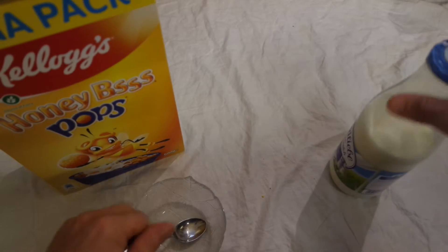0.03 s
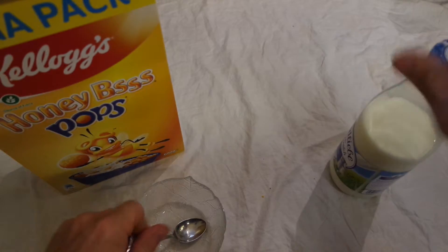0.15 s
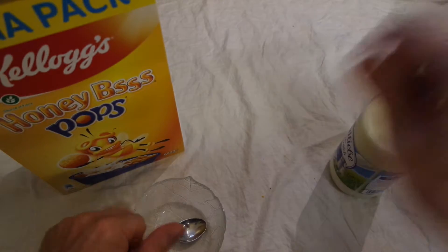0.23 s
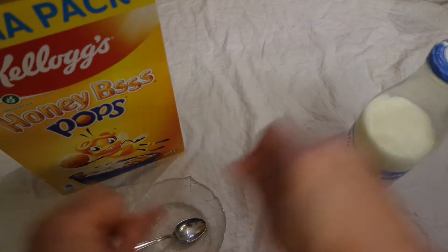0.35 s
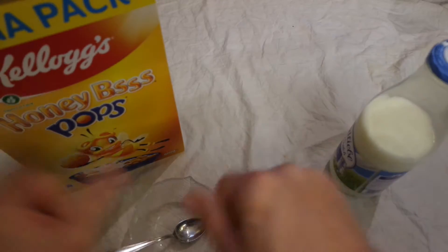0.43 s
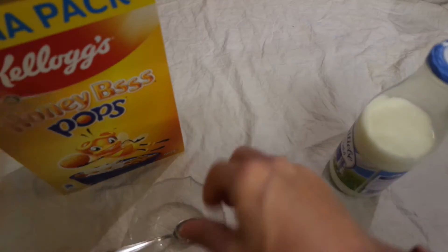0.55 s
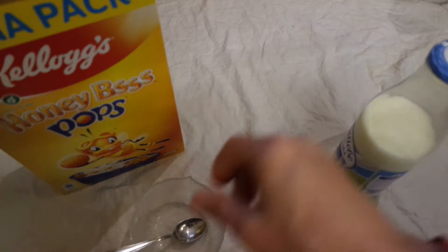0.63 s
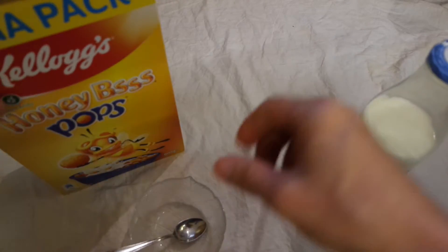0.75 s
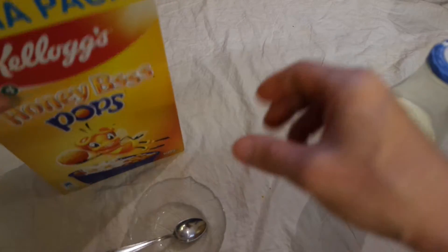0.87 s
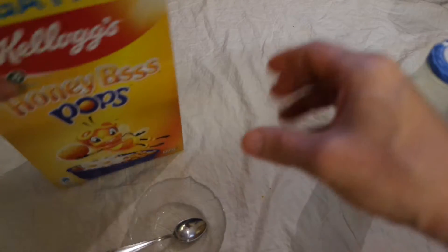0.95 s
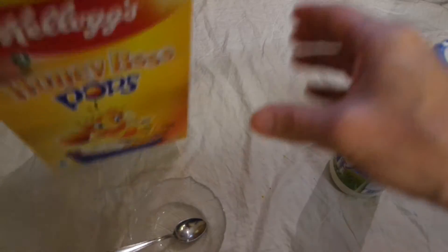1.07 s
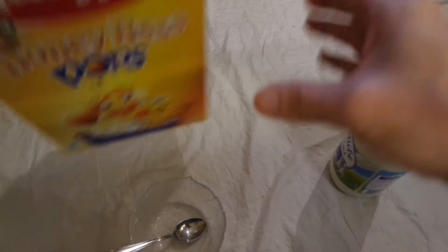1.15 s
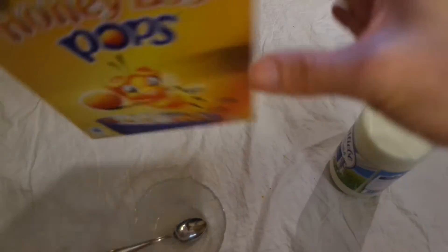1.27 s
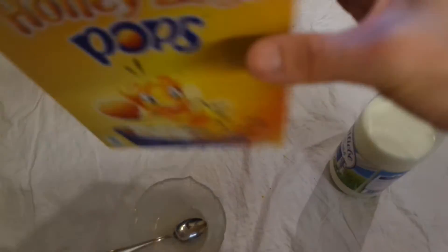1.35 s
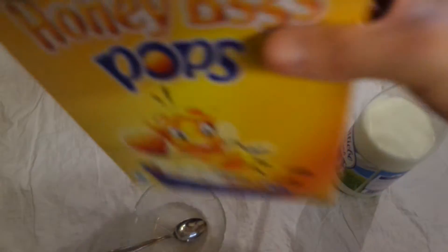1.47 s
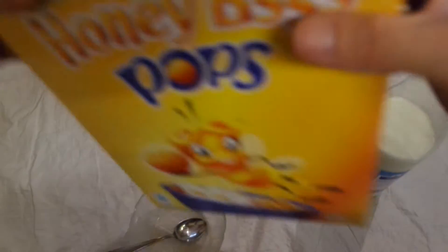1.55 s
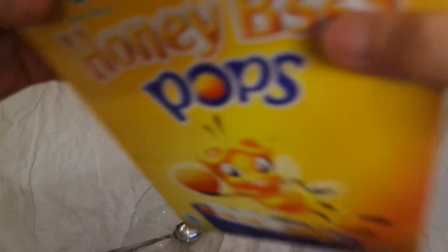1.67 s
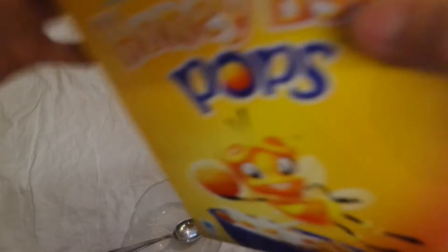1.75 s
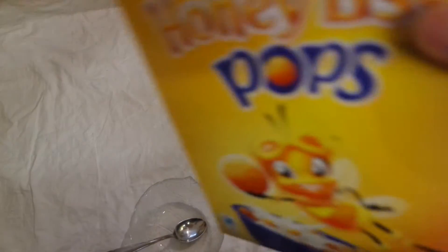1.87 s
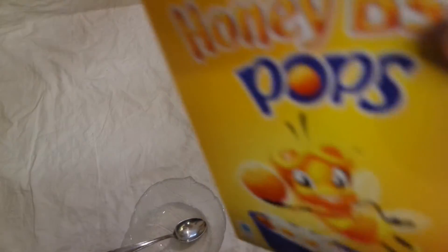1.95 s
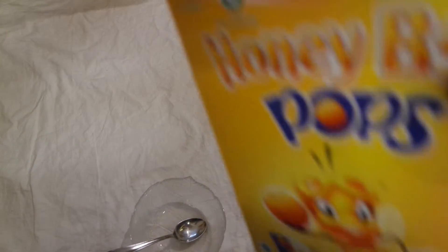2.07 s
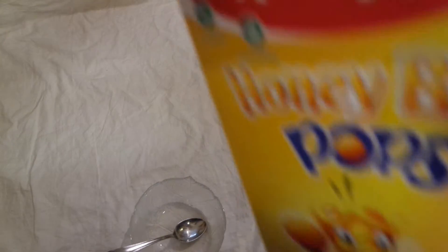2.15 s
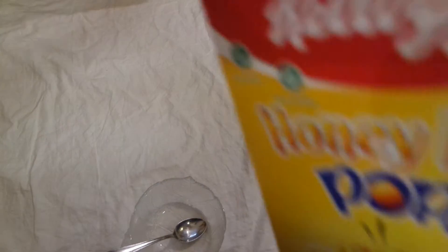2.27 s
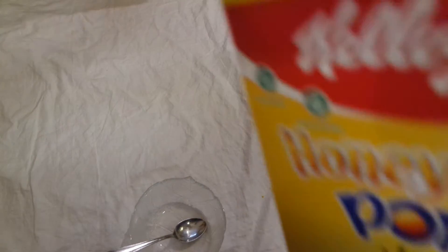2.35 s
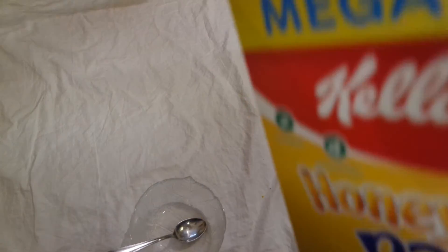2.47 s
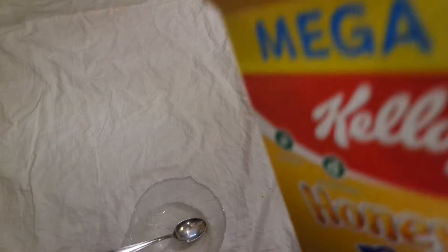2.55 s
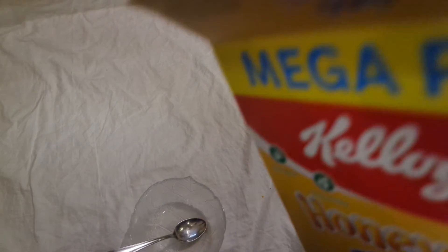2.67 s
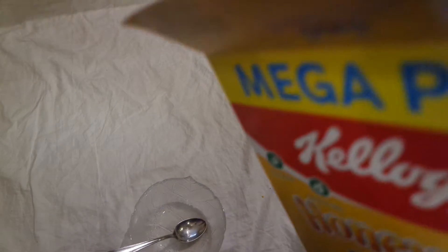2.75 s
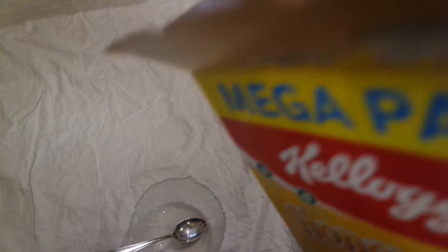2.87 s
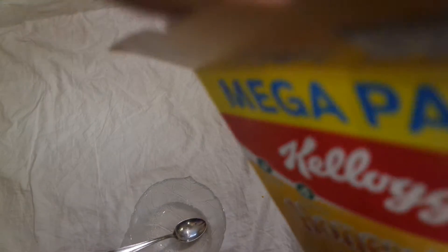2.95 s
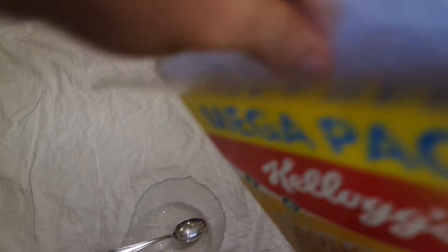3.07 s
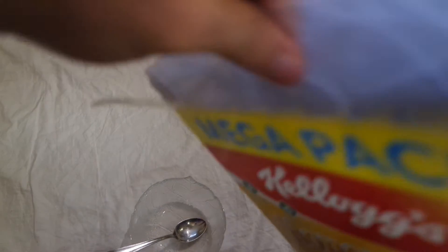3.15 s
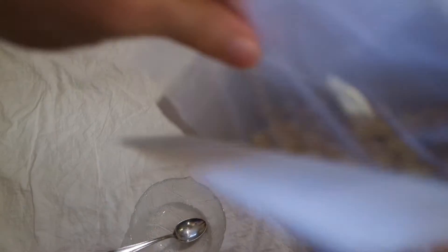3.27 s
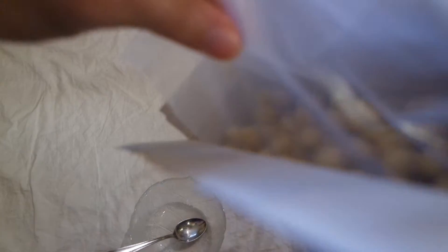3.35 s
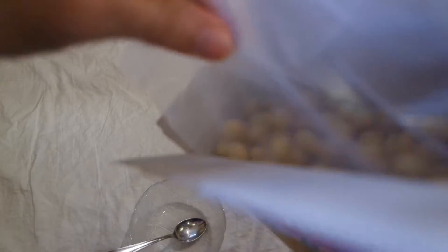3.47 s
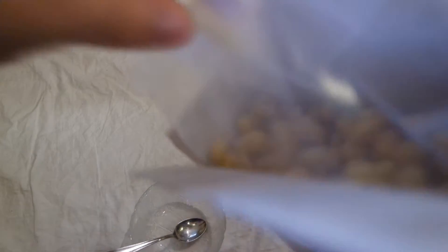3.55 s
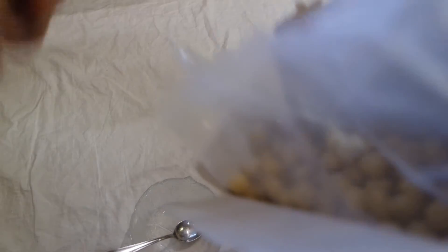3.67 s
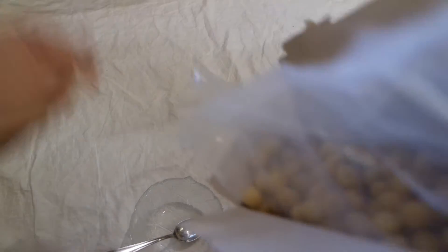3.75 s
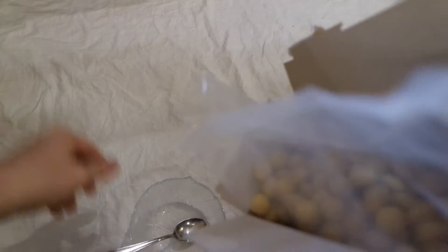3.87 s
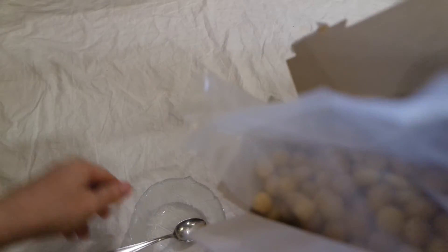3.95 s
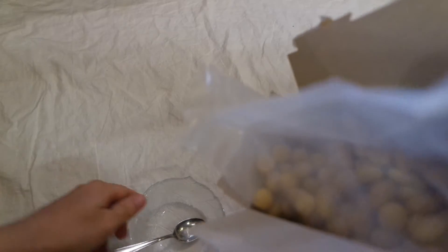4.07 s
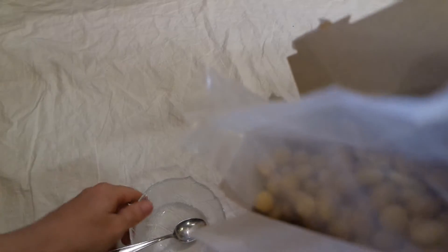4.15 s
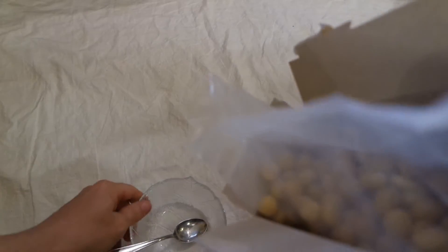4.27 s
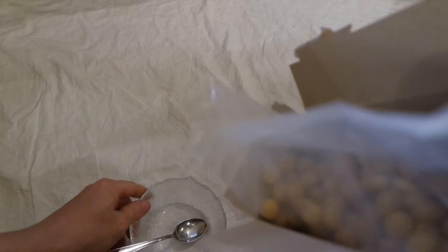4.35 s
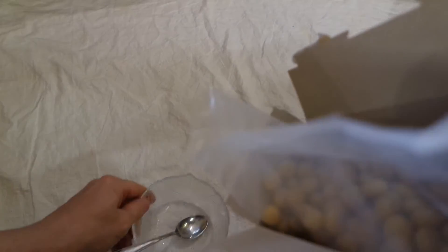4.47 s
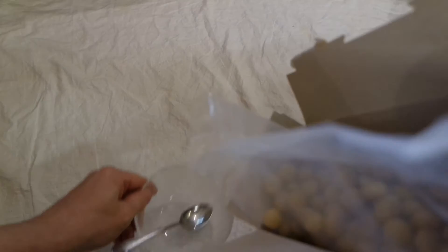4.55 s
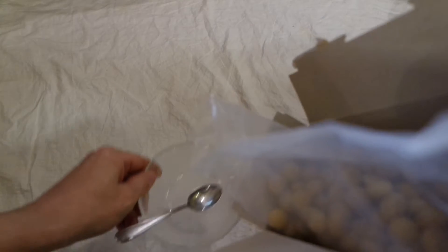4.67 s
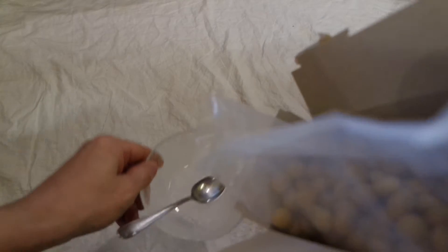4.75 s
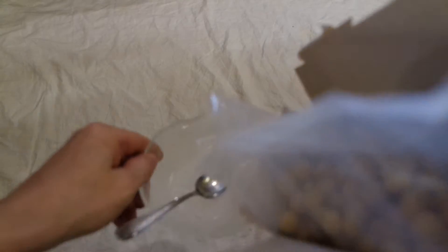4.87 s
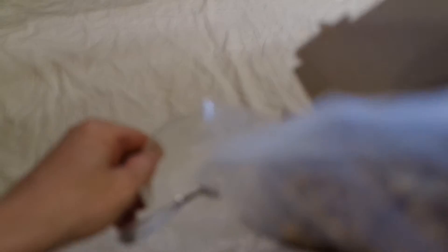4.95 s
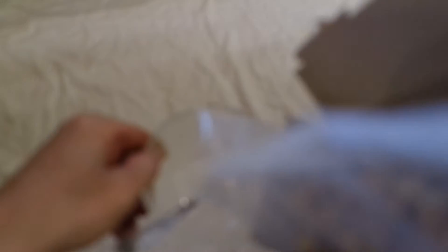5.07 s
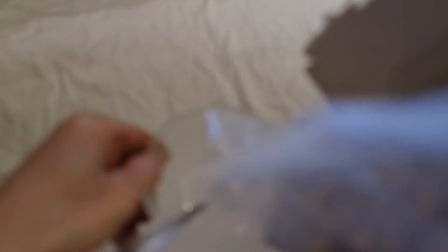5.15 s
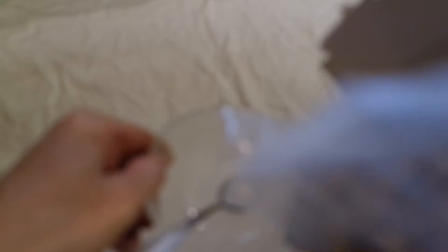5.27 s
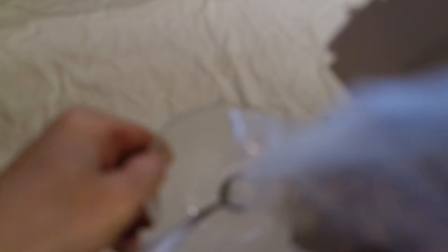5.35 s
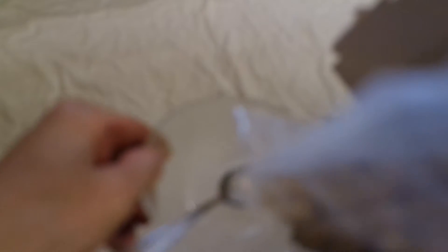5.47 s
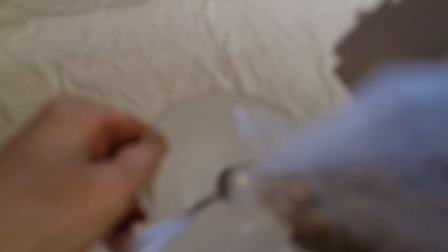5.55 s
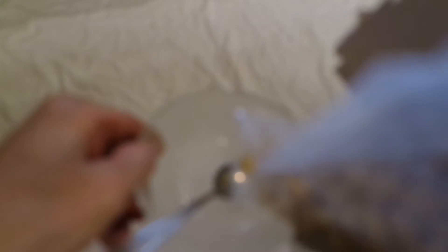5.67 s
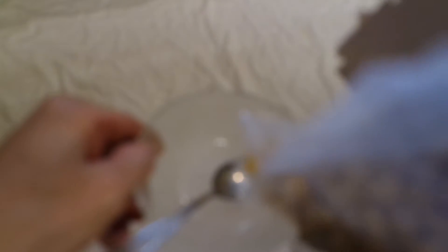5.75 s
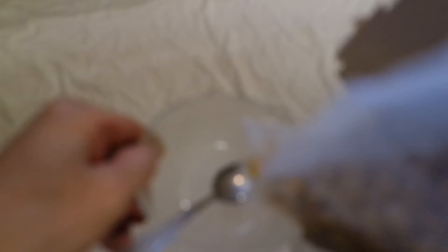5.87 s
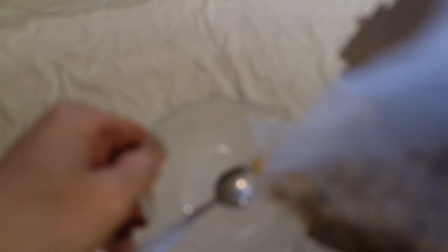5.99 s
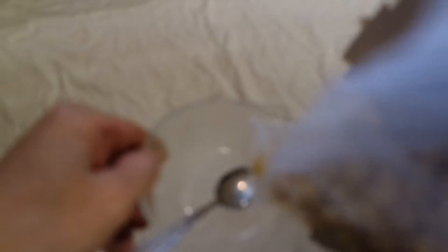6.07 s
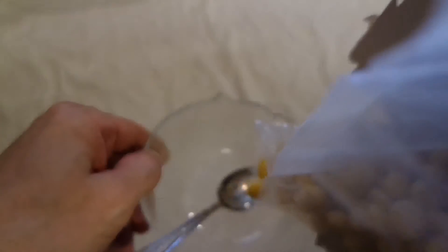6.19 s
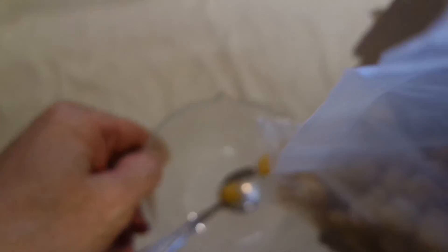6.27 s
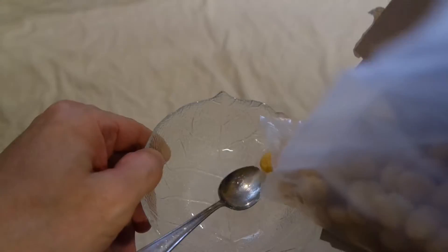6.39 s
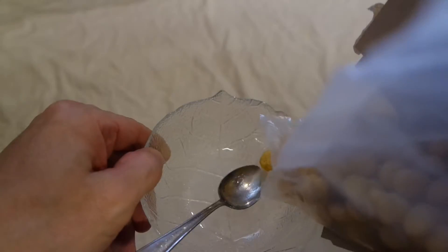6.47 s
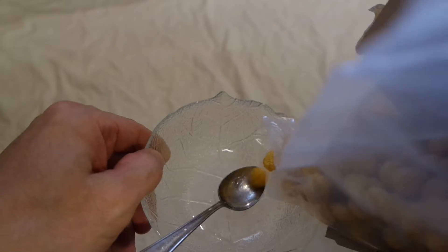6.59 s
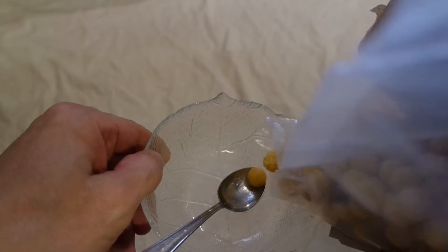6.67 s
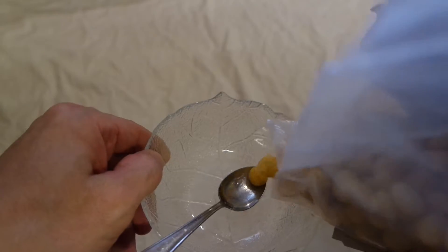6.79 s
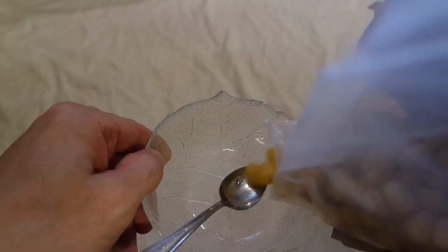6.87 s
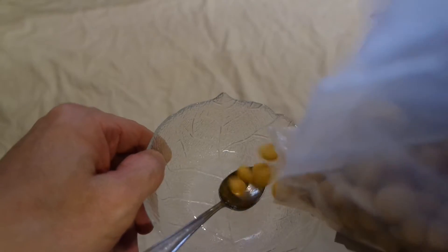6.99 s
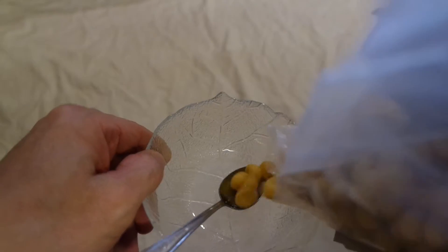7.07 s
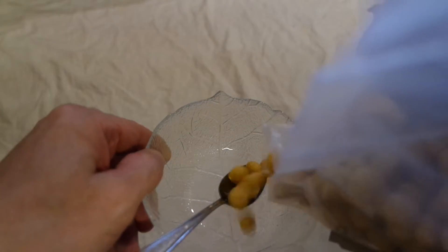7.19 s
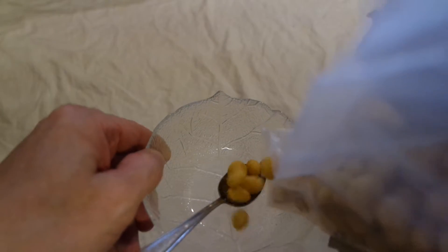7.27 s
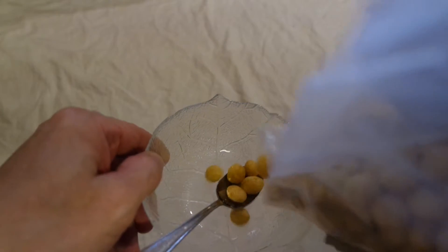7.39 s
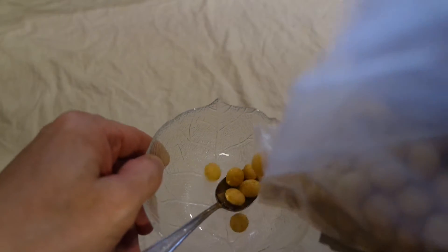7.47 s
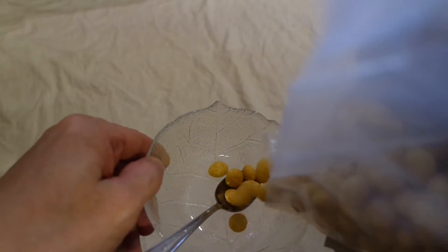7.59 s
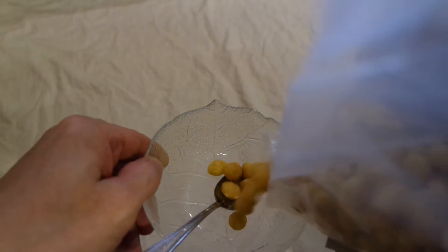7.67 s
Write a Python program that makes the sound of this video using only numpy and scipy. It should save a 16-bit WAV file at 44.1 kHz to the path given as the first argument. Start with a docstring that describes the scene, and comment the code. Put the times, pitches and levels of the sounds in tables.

```python
"""Recorded close up in a small, quiet room, through the two microphone ports of a camera.
First a hand brushes cloth on the left (high hiss), then a cardboard box of cereal balls is lifted and tipped:
a low rumble, tumbling grains, snaps of card and a faint squeak of skin (two gliding whistles).
From 3 s the plastic bag is pulled open (bright bursts); from 6 s the balls slide to its lip.
The first few drop onto a steel spoon in a glass bowl, where chattering contacts feed decaying modes."""
import sys
import numpy as np
from scipy import signal
from scipy.fft import rfft, irfft, next_fast_len
from scipy.io import wavfile
from scipy.ndimage import uniform_filter1d

SR = 44100
rng = np.random.default_rng(int(sys.argv[2]) if len(sys.argv) > 2 else 0)


def dump(signal):
    """Clip the signal to [-1, 1] and save it as 16-bit WAV at the path in sys.argv[1]."""
    limited = np.clip(np.atleast_2d(signal).T, -1, 1)
    pcm = np.round(limited * 32767).astype(np.int16)
    wavfile.write(sys.argv[1], SR, pcm)


N = 340893
TIME = np.arange(N) / SR  # s
EDGE_HZ = 15150  # upper band limit of the recorder

# Steady air of the room and microphone hiss. Each row: frequency in Hz, relative density in dB per Hz.
HUSH_COLOUR = [(12, -30.5), (20, -0.5), (54, -2), (174, -11.5), (302, -10.5), (587, -14), (865, -18),
               (940, -20), (1110, -17.5), (1270, -20), (2620, -21), (6010, -26.5), (15000, -26.5)]
HUSH_DB = -67
# Ring of the room. Each row: frequency in Hz, t60 in s.
ROOM_T60 = [(150, 0.43), (1000, 0.41), (4000, 0.26), (14000, 0.18)]
# Strokes of a hand over the cloth on the left. Each row: time of the peak in s, peak level in dB.
BRUSH_STROKES = [(.11, -76), (.2, -68.5), (.36, -63), (.48, -69), (.58, -54.5)]
BRUSH_DB_PER_S = 271  # each stroke swells and fades at this rate

# Low rumble as the box is gripped and lifted. In order: start in s, rise in s, hold in s.
LIFT_TIMES = (0.81, .03, .48)
LIFT_DB, LIFT_DB_PER_S = -53, 141.5  # level and settling
# Soft thuds of the box and of the bowl on the cloth.
# Each row: start in s, level in dB before the decay, centre in Hz, t60 in s.
THUDS = [(1.675, -35, 110, 0.14), (1.677, -39, 754, 0.29), (2.775, -57, 170, 0.17),
         (3.078, -37.5, 103.6, 0.15), (3.926, -31, 380, 0.061), (4.723, -55.5, 199, 0.34)]
# A fingertip squeaks faintly on the glossy card. Each row: time in s, pitch in Hz, level in dB.
SQUEAK_GLIDE = [(1.97, 12000, -69), (2.02, 12500, -64), (2.13, 12000, -78), (2.2, 13300, -65),
                (2.25, 13600, -63), (2.29, 12100, -72), (2.341, 10770, -91)]
SQUEAK_SECOND = 0.85  # pitch of the second whistle relative to the first

# Colour of the moving load in the closed box, in the opened bag and at its lip.
# Each row: frequency in Hz, relative density in dB per Hz.
BOX_COLOUR = [(24, -45), (40, -12), (86, -4), (173, -8.5), (257, -6.5), (329, -12), (784, -4.5),
              (1080, -12), (1730, -12.5), (3070, -16), (3740, -14), (8480, -22), (12900, -16), (15000, -25)]
BAG_COLOUR = [(24, -53), (40, -16.5), (76, -6), (177, -10), (255, -4), (401, -1.5), (478, -6), (693, -6.5),
              (765, -3), (1080, -8.5), (2060, -10), (2280, -10.5), (5040, -11.5), (8910, -13.5),
              (12900, -14), (15000, -19)]
LIP_COLOUR = [(24, -46), (40, -7.5), (113, -3), (251, -4.5), (392, -1), (676, -0.5), (1030, -1.5),
              (1870, -11), (2390, -12), (3930, -13), (7130, -15), (8480, -19.5), (13300, -18), (15000, -26)]
# Each push or tilt sets the load moving; it keeps going, then settles.
# Each row: start in s, rise in s, hold in s, level of the tumbling in dB, settling in dB per s,
# film rustle relative to the tumbling in dB (both levels before the balance of the container).
SHIFTS = [(0.289, 0.0084, 0.016, -71, 100, 3), (0.823, 0.015, .08, -71.5, 81, -0.5),
          (0.929, .03, .03, -54.5, 130, -4), (1.024, 0.023, .12, -41, 283, -5),
          (1.26, .04, 0.034, -61, 161.5, -0.5), (1.578, 0.087, 0.1, -40.5, 107, -5),
          (1.666, 0.0083, 0.0082, -35, 380, 6.5), (1.787, 0.02, 0.042, -32, 127, -8.5),
          (2.06, 0.023, 0.058, -55.5, 94, -3), (2.512, 0.27, 0.034, -68, 71.5, 0),
          (3.003, 0.0064, 0.085, -41, 218, -0.5), (3.153, 0.015, 0.15, -41, 120, 3),
          (3.316, 0.038, 0.12, -40.5, 53, 1.5), (3.602, 0.066, .22, -36.5, 109, 6),
          (4.501, .02, .03, -69, 108.5, -5), (4.703, 0.011, 0.012, -58, 138.5, -1.5),
          (4.797, 0.092, .33, -71, 80, -10.5), (5.216, 0.036, 0.132, -45.5, 80, -2),
          (5.315, 0.19, 0.2, -31.5, 61.5, 3.5), (5.99, 0.091, 0.23, -49, 86, 1),
          (6.287, 0.048, 0.029, -42, 223, 2.5), (6.451, 0.031, 0.0255, -48, 75.5, 2),
          (6.605, 0.027, 0.21, -47.5, 80, 2), (6.851, 0.049, 0.31, -41.5, 60, 2.5),
          (7.281, 0.023, .03, -46, 117, 8), (7.47, 0.026, 0.033, -47, 301.5, 4.5),
          (7.566, 0.014, 0.17, -44.5, 86, 2)]
# The last few balls come to rest later: share of the tumbling and of the rustle, pace of settling
STRAGGLERS, FILM_STRAGGLERS, STRAGGLER_PACE = 0.13, 0.03, 0.51
# Where the load is when a shift starts: from s, to s
IN_BOX, IN_BAG, AT_LIP = (0, 2.95), (2.95, 5.95), (5.95, 8)

# The loudest snaps of film and card (bright) and knocks of single balls (dull).
# Each row: start in s, level in dB, centre in Hz, t60 in s.
SNAPS = [(0.3031, -51.5, 870, 0.048), (1.0648, -40, 2180, 0.04), (1.0997, -34, 2500, 0.031),
         (1.1523, -36.5, 3200, 0.054), (1.1599, -35, 930, 0.031), (1.6348, -26.5, 3000, 0.0092),
         (1.668, -26, 1310, 0.06), (1.6743, -15.5, 7300, 0.012), (1.6832, -23, 6420.0, 0.031),
         (1.875, -26.5, 1530, 0.0079), (1.9597, -32.5, 1280, 0.014), (1.9951, -35.5, 1840, 0.004),
         (2.0767, -38.5, 870.0, 0.042), (2.1297, -46.5, 1097, 0.053), (2.773, -53, 2230, 0.011),
         (3.0092, -30.5, 6540, 0.018), (3.0592, -25.5, 2620, 0.036), (3.0682, -17.5, 8100, 0.011),
         (3.0764, -23.5, 4500, 0.017), (3.0793, -21.5, 3460, 0.016), (3.0931, -15.5, 5900, 0.003),
         (3.1703, -21.5, 8100, 0.009), (3.1737, -19.5, 6740, 0.014), (3.2003, -32.5, 8000, 0.012),
         (3.218, -25.5, 11500, 0.009), (3.228, -24, 7610.0, 0.0136), (3.2737, -26, 3970, 0.0234),
         (3.3345, -27, 12270.0, 0.008), (3.3551, -21.5, 4400, 0.02), (3.4081, -25, 5170.0, 0.011),
         (3.4208, -17.5, 7400, 0.0046), (3.6403, -26.5, 2070, 0.012), (3.9254, -25.5, 700, 0.017),
         (4.108, -44, 4200, 0.0078), (4.176, -46, 8040, 0.004), (4.517, -57.5, 1073, 0.016),
         (4.5497, -60, 2803, 0.014), (4.7106, -44, 4130, 0.0082), (4.7231, -40, 5730, 0.0061),
         (5.2338, -39, 5000, 0.0054), (5.3307, -35, 6120.0, 0.012), (5.482, -32, 1730, 0.015),
         (5.7316, -31, 975, 0.036), (6.0745, -34.5, 5500, 0.0038), (6.2109, -44, 1580, 0.013),
         (6.335, -35, 5200, 0.0056), (6.3768, -33, 2100, 0.026), (6.3966, -32, 590, 0.028),
         (6.515, -27.5, 2600, 0.0093), (6.9271, -27.5, 2370, 0.027), (7.2541, -26, 7440, 0.0056),
         (7.6085, -34, 1130, 0.019), (7.6782, -33.5, 3810.0, 0.008)]
# Lesser snaps and knocks come by chance: rate, level over the moving load and its scatter,
# range of pitch, mean t60
STRAY_PER_S, STRAY_DB, STRAY_SPREAD_DB, STRAY_HZ, STRAY_T60_S = 18, 0.5, 2.5, (650, 8900), 0.01

# Balls landing on spoon and bowl. Each row: start in s, strength in dB, hardness of the contact in dB,
# place from 0 (spoon) to 1 (glass), first hop in s.
LANDINGS = [(6.458, -17.5, 0, 0.19, 0.021), (6.5209, -24.5, 7.5, 0.12, 0.0055), (6.643, -15, 0, 0, .0417),
            (6.847, -36, -5, 0, 0.0064), (6.915, -34, -17, 0.11, 0.0095), (7.092, -24, 4, 0.2, 0.016),
            (7.1129, -21, 2.5, 0.83, 0.0049), (7.119, -15, 2, 0.29, .0245), (7.193, -24.5, -8.5, 0, 0.0105),
            (7.2098, -18, 5.5, .2, 0.012), (7.2208, -17.5, -1, 0.665, 0.027),
            (7.319, -25.5, -1, 0.11, 0.02), (7.368, -18.5, 4.5, .2, 0.031), (7.418, -34.5, 5, 1, .007),
            (7.439, -31.5, 4.5, 0.47, 0.0076), (7.507, -34, 5, .2, 0.0072),
            (7.5162, -32, 3.5, 0.56, 0.0073), (7.576, -23.5, -13, 0.72, 0.0047),
            (7.615, -24, -29, 0.67, .006), (7.634, -25.5, -25, 0.69, .01), (7.664, -29, -4, 1, 0.016)]
# Modes of the spoon in the bowl. Each row: frequency in Hz, relative level in dB, t60 in s.
SPOON_MODES = [(3040, -25, 0.12), (4660, -22, 0.058), (5620, -11, 0.059), (5540, -7, 0.047),
               (5630, -18.5, 0.054), (5620, -12, 0.059), (6650, -22, 0.042), (7560, -34, .06),
               (9570, 5, 0.048), (10630, -12, 0.023), (11450, -13, 0.069), (13600, -14, 0.065),
               (13620, -2, 0.085), (13200, -13, .05), (13930, -10.5, 0.047)]
# Borders between the low, middle and high group of modes. In order: lower border in Hz, upper border in Hz.
GROUP_BORDERS = [9000, 10200]
# Modes that depend on how the spoon sits on the glass. In order: lower limit in Hz, upper limit in Hz.
SEATED_RANGE = (5000, 6200)
# Each hop is shorter than the one before by this ratio, and comes down weaker and softer (dB)
HOP_RATIO, HOP_DB, HOP_SOFTER_DB = 0.8, -7.5, -3.5
# Crack and high modes grow with hardness, the middle modes towards the glass: relative to the strength (dB)
CRACK_DB, CRACK_PER_HARDNESS, HIGH_DB, MIDDLE_DB, GLASS_DB = -5, 0.66, -1, -30, 24.5
# Chatter decay time (s) for a crack of this level (dB), and its growth as a power of the crack's amplitude
CHATTER_S, CHATTER_AT_DB, CHATTER_POWER = 0.0037, -23.5, 0.53


def amp(db):
    """Decibels to gain."""
    return np.exp(np.asarray(db) * (np.log(10) / 20))


def unit(x):
    """Scales to rms 1."""
    return x / np.sqrt(np.mean(x ** 2) + 1e-20)


def read(points, hz):
    """Reads a table on a log-frequency axis."""
    f, value = np.transpose(points)
    return np.interp(np.log(hz + 1), np.log(f + 1), value)


def swell(s, db):
    """Gain over time from a level curve, practically silent outside it."""
    return amp(np.interp(TIME, s, db, left=-140, right=-140))


def shape(x, gain):
    """Filters x by a gain that is a function of frequency."""
    size = next_fast_len(x.shape[-1])
    spectrum = rfft(x, size) * gain(np.fft.rfftfreq(size, 1 / SR))
    return irfft(spectrum, size)[..., :x.shape[-1]]


def bump(f, hz, q):
    """Response of one broad resonance."""
    return 1 / (1 + 1j * q * ((f + 1) / hz - hz / (f + 1)))


def add(mix, s, sound):
    """Mixes a stereo sound in at time s."""
    part = mix[:, round(s * SR):][:, :sound.shape[1]]
    part += sound[:, :part.shape[1]]


def ports(x, lag):
    """The left port hears the source lag samples after the right one (before it when negative)."""
    left = shape(x, lambda f: np.exp(-2j * np.pi * f * lag / SR))
    return np.array([left, x])


def diffuse(pair, alike_hz, alike=0.54):
    """Two unrelated signals become a diffuse field: alike in the bass, unrelated in the treble."""
    same = lambda f: alike / (1 + (f / alike_hz) ** 2)
    right = shape(pair[0], same) + shape(pair[1], lambda f: np.sqrt(1 - same(f) ** 2))
    return np.array([pair[0], right])


def hush():
    """Steady room air and microphone hiss: diffuse coloured noise."""
    air = diffuse(rng.standard_normal((2, N)), 1400)
    return amp(HUSH_DB) * unit(shape(air, lambda f: amp(read(HUSH_COLOUR, f))))


def room(x, near_db=-9.5, near_t60=0.034, tail_db=-12):
    """Quick echoes from table and box, then the tail of a small room that fades at its own pace per pitch."""
    t = np.arange(SR // 2) / SR
    taps = rng.standard_normal((2, len(t))) * (rng.random((2, len(t))) < 4000 / SR)
    hz, when, z = signal.stft(taps, SR, nperseg=256)
    fading = z * amp(-60 * when / read(ROOM_T60, hz)[:, None])
    tail = signal.istft(fading, SR, nperseg=256)[1][:, :len(t)] * (t > 0.006)
    near = rng.standard_normal((2, len(t))) * amp(-60 * t / near_t60) * (t > 0.001)
    both = amp(tail_db) * unit(tail) + amp(near_db) * unit(near)
    echo = diffuse(both, 2800, alike=0.93) / np.sqrt(len(t))
    return signal.fftconvolve(x, echo, axes=1)[:, :N]


def brush(hz=13000, q=1.87, right_db=-8):
    """Skin sliding over cloth: a faint, very high hiss, weaker at the right port."""
    strokes = sum(amp(db - BRUSH_DB_PER_S * abs(TIME - s)) for s, db in BRUSH_STROKES)
    hiss = unit(shape(rng.standard_normal((2, N)), lambda f: bump(f, hz, q) ** 2))
    return hiss * strokes * amp([[0], [right_db]])


def push(start, rise, hold, db, settle, stragglers=0):
    """Gain over time of one movement: it builds up, holds and dies away; a share of stragglers lasts longer."""
    t = TIME - start
    fall_db = -settle * np.maximum(t - rise - hold, 0)
    settling = (1 - stragglers) * amp(fall_db) + stragglers * amp(STRAGGLER_PACE * fall_db)
    return amp(db) * np.clip(t / rise, 0, 1) * settling


def handling(lift_hz=28, thud_q=0.9):
    """Rumble of the lift (diffuse bass noise) and dull thuds (short bursts through a broad resonance)."""
    noise = diffuse(rng.standard_normal((2, N)), 60, alike=0.5)
    rumble = unit(shape(noise, lambda f: bump(f, lift_hz, 0.96) ** 2))
    out = rumble * push(*LIFT_TIMES, LIFT_DB, LIFT_DB_PER_S)
    t = np.arange(16384) / SR
    for s, db, hz, t60 in THUDS:
        body = unit(shape(rng.standard_normal(len(t)), lambda f: bump(f, hz, thud_q) ** 2))
        soft_onset = 1 - np.exp(-t / 0.0016)
        add(out, s, ports(body * amp(db - 60 * t / t60) * soft_onset, 0.87))
    return out


def squeak(waver=0.005, second_db=-9, flutter_db=5):
    """Skin sticks and slips on the card: two thin, unsteady whistles that glide together."""
    s, hz, db = np.transpose(SQUEAK_GLIDE)
    unsteady = unit(uniform_filter1d(rng.standard_normal(N), size=30))
    pitch = np.interp(TIME, s, hz) * (1 + waver * unsteady)
    phase = 2 * np.pi * np.cumsum(pitch) / SR
    grip = amp(flutter_db * unit(uniform_filter1d(rng.standard_normal(N), size=600)))
    whistles = np.sin(phase) + amp(second_db) * np.sin(SQUEAK_SECOND * phase)
    return ports(unit(grip * whistles) * swell(s, db), 0)


def motion(span):
    """Gains over time of the tumbling balls and of the rustling film, from the shifts that start in the span."""
    rows = [row for row in SHIFTS if span[0] <= row[0] < span[1]]
    tumble = sum(push(*movement, STRAGGLERS) ** 2 for *movement, _ in rows)
    rustle = sum((push(*movement, FILM_STRAGGLERS) * amp(film_db)) ** 2 for *movement, film_db in rows)
    return np.sqrt(tumble), np.sqrt(rustle)


def grains(per_s, spread_db, t60, lag, clump, count=24):
    """Tiny collisions of uneven size that come in small avalanches, each kind with its own pitch and direction."""
    t = np.arange(512) / SR
    surge = unit(shape(rng.standard_normal(N), lambda f: abs(bump(f, 25, 0.98)) ** 2))
    avalanche = np.exp(clump * surge)
    happens = rng.random(N) < per_s / SR * avalanche / avalanche.mean()
    size = amp(spread_db * np.minimum(rng.exponential(1, N), 4)) * happens * rng.choice([-1, 1], N)
    kind = rng.integers(0, count, N)
    bursts = rng.standard_normal((count, len(t))) * amp(-60 * t / t60)
    ticks = []
    for burst, hz in zip(bursts, np.geomspace(500, 13000, count)):
        tick = unit(shape(burst, lambda f: 0.48 + bump(f, hz, 1.3)))
        ticks.append(ports(tick, lag + rng.normal(0, 0.9)))
    ticks = np.array(ticks)
    at = np.flatnonzero(size)
    places = (at[:, None] + np.arange(len(t))).ravel()
    sums = [np.bincount(places, (size[at, None] * ticks[kind[at], ear]).ravel(), N)[:N] for ear in range(2)]
    # together the kinds are white; the container gives the colour
    mean = np.sqrt((abs(rfft(ticks[:, 1])) ** 2).mean(0))
    return shape(np.array(sums), lambda f: 1 / np.interp(f, np.fft.rfftfreq(len(t), 1 / SR), mean))


def shifting(gains, colour, balls_per_s, film_per_s, spread_db, t60, film_t60, clump, ball_db, film_db, lag,
             split_hz=2500):
    """Balls tumble against each other (below the split) and crinkle the film around them (above it)."""
    tumble, rustle = gains
    low = lambda f: 1 / np.sqrt(1 + (f / split_hz) ** 4)
    high = lambda f: np.sqrt(1 - low(f) ** 2)
    balls = grains(balls_per_s, spread_db, t60, lag, clump)
    balls = shape(balls, lambda f: amp(read(colour, f)) * low(f))
    film = grains(film_per_s, spread_db, film_t60, lag, clump)
    film = shape(film, lambda f: amp(read(colour, f)) * high(f))
    return unit(balls) * tumble * amp(ball_db) + unit(film) * rustle * amp(film_db)


def strays(tumble, rustle, split_hz=2500):
    """Chance knocks (dull) follow the balls and chance snaps (bright) the film: rows like those of SNAPS."""
    rows = []
    for when, pitch, size, length in rng.random((round(STRAY_PER_S * N / SR), 4)):
        hz = STRAY_HZ[0] * (STRAY_HZ[1] / STRAY_HZ[0]) ** pitch
        load = (tumble if hz < split_hz else rustle)[int(when * N)]
        db = 20 * np.log10(load + 1e-9) + STRAY_DB + STRAY_SPREAD_DB * (2 * size - 1)
        rows.append((when * N / SR, db, hz, STRAY_T60_S * (0.5 + length)))
    return rows


def snaps(rows, q=0.3, buckle_db=-2, buckle_t60=0.0024, sheet_db=-26, sheet_t60=0.052, lag=1, top=2.46,
          microphone_db=3, microphone_hz=12500):
    """A crease buckles or a ball knocks: a sharp edge, a short burst, then the sheet shivers on."""
    out, t = np.zeros((2, N)), np.arange(4096) / SR
    for s, db, hz, t60 in rows:
        buckle = amp(buckle_db - 60 * t / buckle_t60)
        sheet = amp(sheet_db - 60 * t / sheet_t60)
        fall = buckle + amp(-60 * t / t60) + sheet
        # a soft contact lasts longer, so a dull knock has little treble
        soft = lambda f: (f < EDGE_HZ) / np.sqrt(1 + (f / (top * hz)) ** 4)
        # a broad resonance of the microphone lifts the high treble
        microphone = lambda f: 1 + amp(microphone_db) * bump(f, microphone_hz, 4.4)
        edge_and_burst = rng.choice([-1, 1], len(t)) * fall
        snap = shape(edge_and_burst, lambda f: bump(f, hz, q) * soft(f) * microphone(f))
        snap /= np.sqrt(np.mean(snap[:150] ** 2))  # the level is that of the first 3.4 ms
        add(out, s, amp(db) * ports(snap, lag + rng.normal(0, 0.66)) * (1 - t / t[-1]))
    return out


def hops(count=3):
    """Each ball comes down and hops on: (s, crack dB, low, middle and high ring dB, chatter s) of every touch."""
    for s, db, hard, glass, hop in LANDINGS:
        for k in range(count):
            crack = db + CRACK_DB + CRACK_PER_HARDNESS * hard
            chatter = CHATTER_S * amp(crack - CHATTER_AT_DB) ** CHATTER_POWER
            yield s, crack, db, db + MIDDLE_DB + GLASS_DB * glass, db + HIGH_DB + hard, chatter
            s += hop * HOP_RATIO ** k
            db, hard = db + HOP_DB, hard + HOP_SOFTER_DB


def landings(crack_db=-1, crack_hz=7500, crack_q=1.9, rattle_db=-21, rattle_t60=0.59, uneven_db=2,
             stiffen=0.0294, lifting_db=-26, wander=0.0029):
    """A ball lands; the spoon chatters on the glass for a few ms, and each contact feeds its modes."""
    out, t = np.zeros((2, N)), np.arange(8192) / SR
    for s, crack, low, middle, high, chatter in hops():
        contacts = rng.standard_normal(len(t)) * np.exp(rng.normal(0, 0.61, len(t)))
        blow = contacts * np.exp(-t / chatter)
        rattle = contacts * amp(rattle_db - 60 * t / rattle_t60)
        click = shape(blow + rattle, lambda f: bump(f, crack_hz, crack_q) * (f < EDGE_HZ))
        click /= np.sqrt(np.mean(click[:150] ** 2))  # the level is that of the first 3.4 ms
        sound = amp(crack + crack_db) * ports(click, rng.normal(1, 1)) * (1 - t / t[-1])
        # a light touch leaves the spoon firmly seated, so it rings higher than after a hard blow
        seated = 1 + stiffen * np.clip((lifting_db - crack) / 10, 0, 1)
        for hz, db, t60 in SPOON_MODES:
            seating = seated if SEATED_RANGE[0] < hz < SEATED_RANGE[1] else 1
            pitch = hz * seating * (1 + wander * rng.standard_normal())
            pole = amp(-60 / (t60 * SR)) * np.exp(2j * np.pi * pitch / SR)
            ring = signal.lfilter([1], [1, -pole], blow)
            ring /= abs(ring).max()
            # where the ball lands decides how strongly each group of modes rings
            strike = (low, middle, high)[np.searchsorted(GROUP_BORDERS, hz)] + rng.normal(0, uneven_db)
            # short waves reach the two ports out of step
            turn = np.exp(1j * rng.normal(0, 1) * hz / 5500)
            sound = sound + amp(db + strike) * np.sqrt(2) * np.array([ring * turn, ring]).real
        add(out, s, sound)
    return out


def scene():
    """Box, bag and falling balls in the room."""
    in_box, in_bag, at_lip = motion(IN_BOX), motion(IN_BAG), motion(AT_LIP)
    box = shifting(in_box, BOX_COLOUR, balls_per_s=1100, film_per_s=2200, spread_db=2, t60=0.016,
                   film_t60=0.01, clump=0.25, ball_db=-0.5, film_db=-1.5, lag=-0.39)
    bag = shifting(in_bag, BAG_COLOUR, balls_per_s=1300, film_per_s=2400, spread_db=1.5, t60=0.013,
                   film_t60=0.0036, clump=0.25, ball_db=-1.0, film_db=-1.5, lag=1.91)
    lip = shifting(at_lip, LIP_COLOUR, balls_per_s=450, film_per_s=500, spread_db=1.3, t60=0.016,
                   film_t60=0.003, clump=0.45, ball_db=0.0, film_db=-1, lag=2.87)
    tumble, rustle = np.sum([in_box, in_bag, at_lip], axis=0)
    creases = snaps(SNAPS + strays(tumble, rustle))
    port_balance = amp([[-1], [0.5]])  # left, right
    direct = (box + bag + lip + creases + squeak()) * port_balance + landings()
    return hush() + room(direct) + brush() + handling() + direct


def record(dry):
    """The recorder's band limit: a steep low-pass."""
    lowpass = signal.firwin(255, EDGE_HZ, window=("kaiser", 8), fs=SR)
    return signal.oaconvolve(dry, lowpass[None], "same")


dry = scene()
out = record(dry)
dump(out)
```